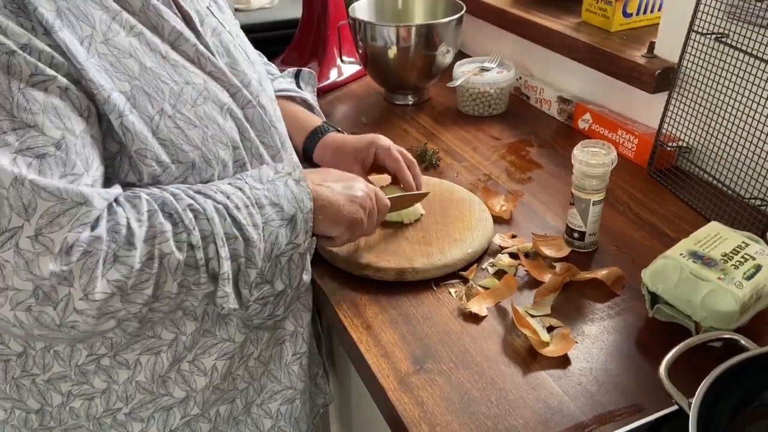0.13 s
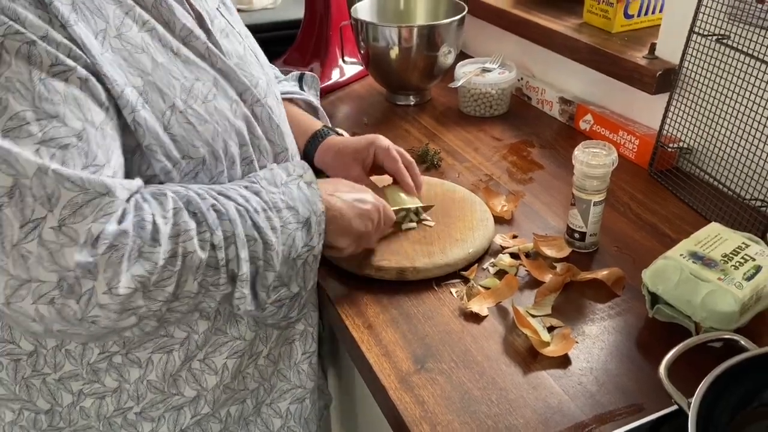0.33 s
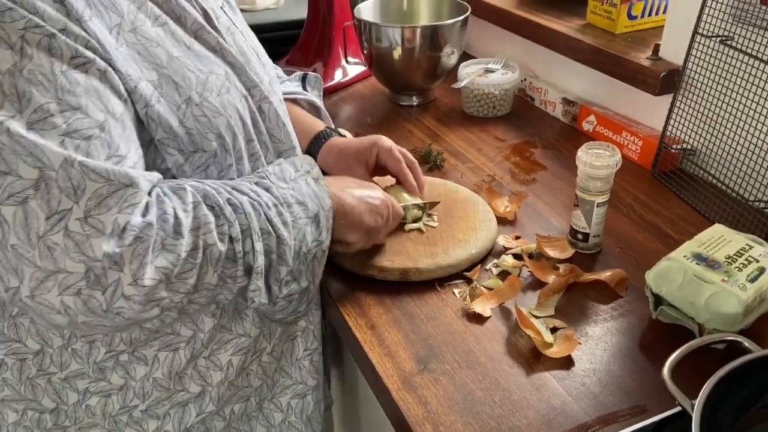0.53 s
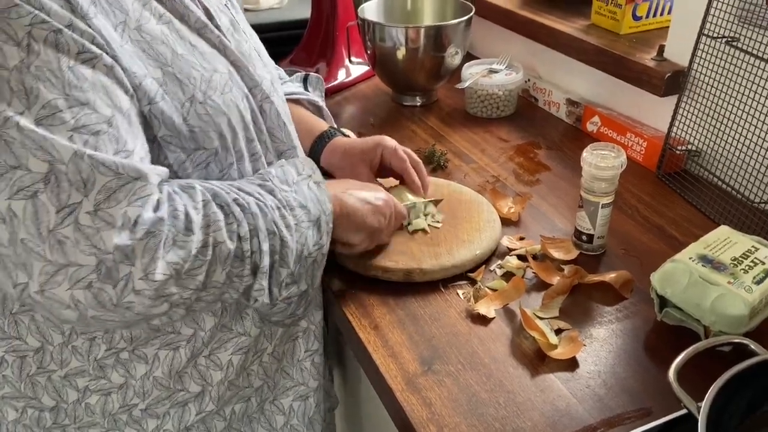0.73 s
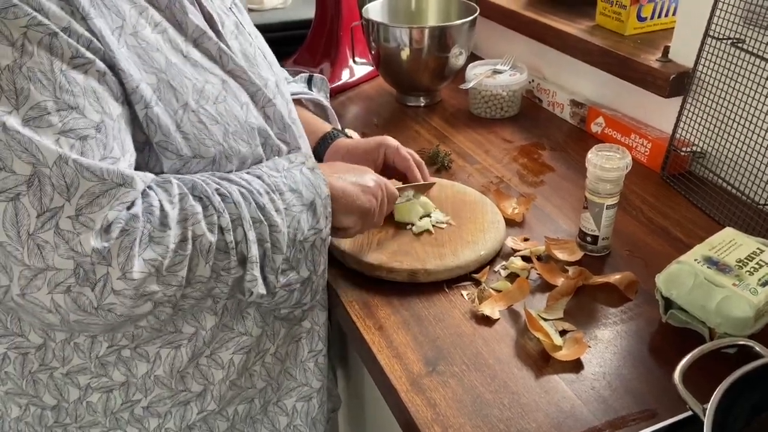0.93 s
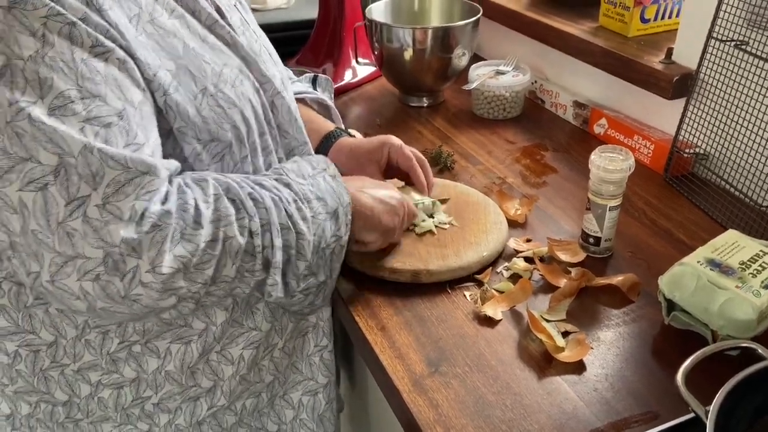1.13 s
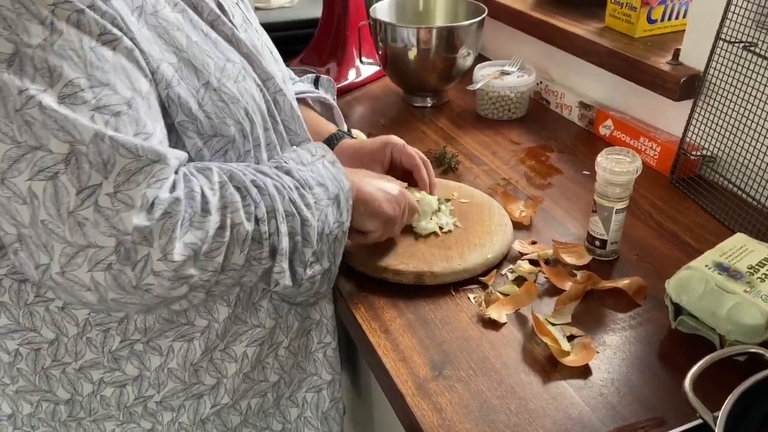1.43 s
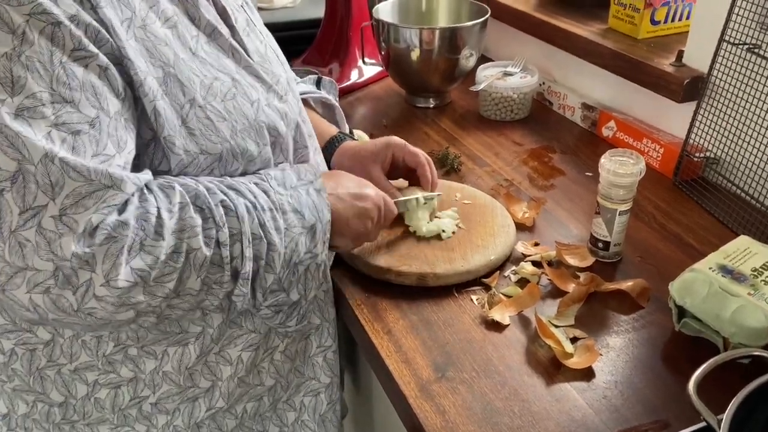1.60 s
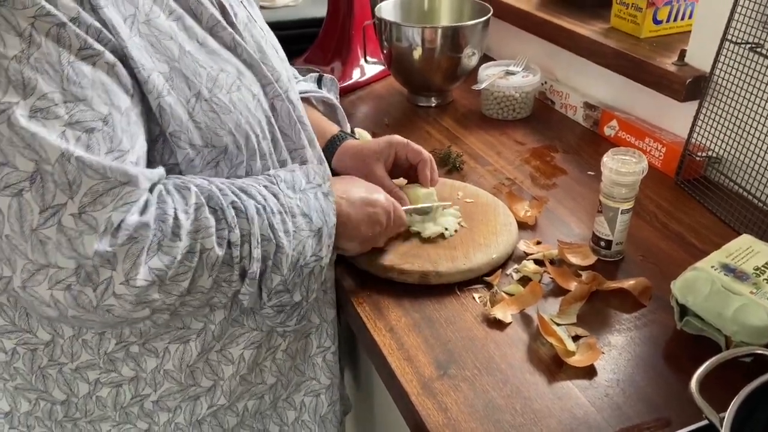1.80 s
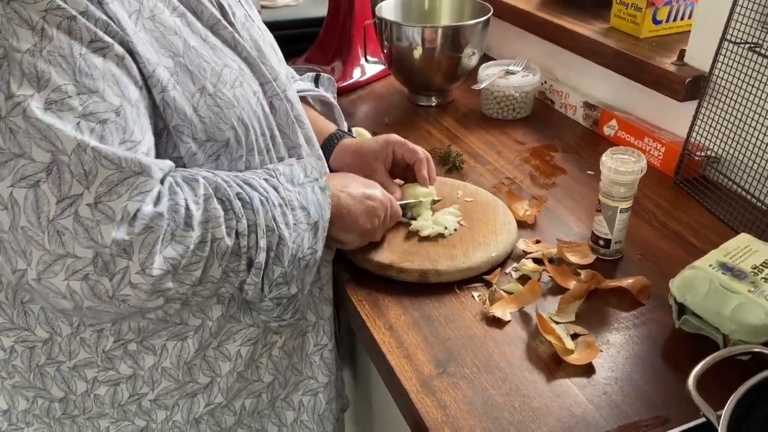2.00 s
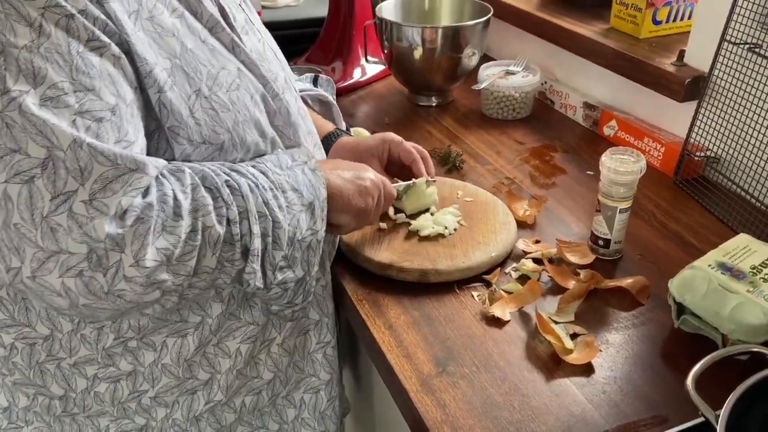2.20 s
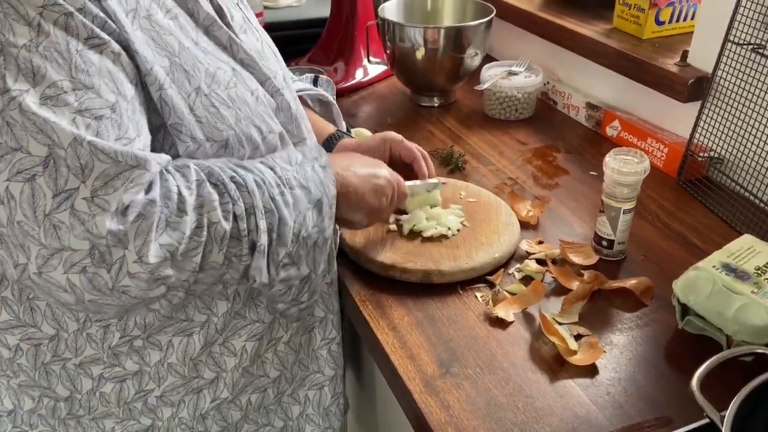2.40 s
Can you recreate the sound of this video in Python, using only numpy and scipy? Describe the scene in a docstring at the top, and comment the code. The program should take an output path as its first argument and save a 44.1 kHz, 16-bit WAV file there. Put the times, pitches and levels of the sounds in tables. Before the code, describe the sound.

Kitchen knife chopping an onion on a wooden board, crisp crunches and sharp knocks, close up

```python
"""Sharp knocks of a kitchen knife on a round wooden board are heard, each after an onion's crunch, close to a phone.
Knocks are damped blade and board modes; the crunch is random grains in noise; the last cut ends without a knock.
Delayed echoes and decaying noise bands give the small kitchen's brief ring; the counter adds dull bumps.
The phone's noise suppressor attenuates quiet passages, so the room hiss comes forward only around sounds."""
import sys
import numpy as np
from scipy import signal
from scipy.fft import rfft, irfft
from scipy.io import wavfile
from scipy.ndimage import uniform_filter1d

SR = 44100
rng = np.random.default_rng(int(sys.argv[2]) if len(sys.argv) > 2 else 0)


def generate_wav(signal):
    """Clip the signal to [-1, 1] and save it as 16-bit WAV at the path in sys.argv[1]."""
    frames = np.transpose(np.atleast_2d(signal))
    scaled = np.clip(frames, -1, 1) * 32767
    pcm = np.round(scaled).astype(np.int16)
    wavfile.write(sys.argv[1], SR, pcm)


N = 112454

# Levels in the tables are relative; gains below or in the functions are added to them.
# spectral density of room tone and microphone hiss: f/Hz, level/dB
HISS_SPECTRUM = [(24, -47), (40, -19), (151, -5), (312, -15), (382, -21.5), (585, -15), (2770, -35.5),
                 (9940, -32.5), (14500, -27.5), (16000, -42.5)]
# dull bumps of the counter under the hands: t/s, level/dB
COUNTER_BUMPS = [(.25, -49.5), (.325, -55), (.455, -54), (.492, -45), (.565, -54.5), (.728, -43.5),
                 (.81, -53.5), (1.1, -45), (1.17, -51), (1.375, -41.5), (1.51, -45.5), (1.725, -47.5),
                 (1.985, -46), (2.243, -38), (2.275, -42.5), (2.33, -60)]
# echoes off counter and nearby walls: delay/s, left gain, right gain
NEAR_ECHOES = [(.0011, -0.091, 0.27), (.0031, 0.66, .5), (.0052, -0.47, .5), (.0073, .5, .2),
               (0.014, -.2, .35), (.0165, 0.59, .2), (.0195, .2, .3)]
# decay of the kitchen's reverberation: f/Hz, t60/s
KITCHEN_DECAY = [(100, 0.25), (300, 0.44), (800, .26), (2000, 0.28), (5000, 0.22), (12000, 0.12)]
# initial spectrum of the reverberation: f/Hz, level/dB
KITCHEN_SPECTRUM = [(100, 1), (500, -13), (1500, -6.5), (3200, -9), (5000, -5), (6500, -4), (16000, 1)]
# left-right correlation of the reverberation: f/Hz, correlation (0 to 1)
KITCHEN_CORRELATION = [(100, 0.89), (500, 0.83), (1500, 0.39), (5000, 0.13), (14000, 0.34)]
# stereo balance: f/Hz, left minus right level/dB
STEREO_BALANCE = [(60, -0.5), (300, -2.5), (1000, 0), (2000, 1.5), (4500, 3.5), (9000, 2.5), (14000, 1.5)]
# blade going through the onion, one list a stroke: t/s, crunch level/dB, push on the board level/dB
CUT_STROKES = [
    [(0.209, -50, -61.5), (0.231, -49.5, -52.5), (0.237, -39, -47.5)],
    [(0.438, -54, -49.5), (0.454, -47, -47), (0.471, -36, -43.5)],
    [(0.68, -49, -54.5), (0.688, -66, -41), (0.696, -54.5, -43.5), (0.704, -39.5, -96), (0.712, -62, -40),
     (0.719, -43, -39)],
    [(1.03, -69, -99), (1.056, -46, -50), (1.081, -40, -48.5)],
    [(1.312, -64, -56.5), (1.332, -49.5, -52.5), (1.338, -62.5, -62), (1.348, -60.5, -50),
     (1.362, -61.5, -40.5), (1.388, -34, -45)],
    [(1.68, -77, -103.5), (1.684, -64.5, -83), (1.712, -41.5, -49.5)],
    [(1.935, -57.5, -71), (1.941, -46, -42), (1.951, -43.5, -38.5), (1.961, -33.5, -48)],
    [(2.189, -48.5, -67), (2.195, -64, -59), (2.227, -46.5, -43), (2.25, -33, -38.5)],
    [(2.503, -68, -87), (2.515, -74.5, -68.5), (2.527, -68.5, -73.5), (2.549, -51.5, -55.5)],
]
# small snaps of onion layers and the lifting blade: t/s, level/dB, decay time constant/s
LAYER_SNAPS = [(0.3384, -42, 0.0021), (0.4225, -47.5, 0.0054), (0.438, -47, 0.0056), (0.463, -47, 0.0029),
               (0.653, -50.5, 0.0057), (0.6772, -36.5, 0.005), (0.7074, -32, 0.011), (0.722, -27.5, 0.0046),
               (1.0313, -48, 0.0033), (1.053, -37.5, 0.0029), (1.0801, -30.5, 0.01), (1.285, -48, 0.0029),
               (1.3116, -35, 0.0023), (1.3326, -40, 0.0027), (1.346, -32.5, 0.0075), (1.348, -47, 0.0035),
               (1.3673, -30.5, 0.0049), (1.398, -37, 0.0022), (1.4742, -39.5, 0.0094),
               (1.4944, -51, 0.0028), (1.5495, -50.5, 0.0031), (1.6506, -50, 0.0071), (1.8997, -50.5, 0.01),
               (1.938, -33.5, 0.0026), (2.1884, -39.5, 0.004), (2.2023, -36, 0.0089),
               (2.224, -31.5, 0.0028), (2.238, -35, 0.004), (2.26, -18, 0.0015), (2.353, -42, 0.0068),
               (2.5023, -46.5, 0.0062)]
# faint treble rustle before some of the cuts, one list a passage: t/s, level/dB
FAINT_RUSTLES = [
    [(0.07, -103), (0.112, -63.5), (0.188, -63.5), (0.21, -58)],
    [(1.6, -93.5), (1.66, -87), (1.67, -90), (1.68, -62)],
    [(1.76, -66), (1.812, -61), (1.926, -66.5), (1.935, -55)],
]
# spectrum of bursting cells: f/Hz, level/dB
CRUNCH_SPECTRUM = [(600, -28), (1500, -10), (3000, -3.5), (4500, -2.5), (6000, -7.5), (9000, -8),
                   (12000, -7.5), (14500, -6), (16000, -2)]
# board modes that the pushing blade shakes: f/Hz, bandwidth/Hz, level/dB
PUSHED_MODES = [(390, 100, -13), (520, 45, -4), (745, 45, 0), (930, 100, -12), (1500, 900, -22)]
# blade meets board: t/s, blade tick level/dB, upper board modes level/dB, deep board modes level/dB
BLADE_LANDINGS = [(.2470, -17.5, -16.5, -19), (.4814, -18.5, -16.5, -19.5), (.7290, -22.5, -18.5, -20),
                  (1.0906, -24.5, -20.5, -19.5), (1.3979, -24, -20, -19), (1.7224, -27, -25, -25),
                  (1.9710, -19.5, -21, -21), (2.2605, -18, -21, -20.5)]
# board modes: f/Hz, level/dB, t60/s
BOARD_MODES = [(207.3, -26.5, 0.047), (285, -10.5, 0.021), (453.5, -10.5, 0.033), (536, -8, 0.067),
               (745.6, -2, 0.028), (902, 1.5, 0.021), (1209.7, -13, 0.028), (1303, -8.5, 0.033),
               (1585.5, 0.5, 0.011), (1808, 9.5, 0.0077), (2187, 11.5, 0.006), (2590, 10.5, 0.0039)]
# blade modes: f/Hz, level/dB, t60/s
BLADE_MODES = [(3563, 6, 0.0048), (4396, -6.5, 0.012), (4822, 11, 0.0027), (5343, -9, 0.002),
               (6020, -19, 0.0097), (8420, -21, 0.0057)]

HISS_DB, HISS_CORRELATION = -62, 0.38  # RMS level ahead of the suppressor
THUD_HZ, THUD_T60_S, THUD_RISE_CYCLES = 109.5, 0.098, 0.44

TAIL_DB, TAIL_RISE_S = -4, 0.0084
ECHO_LOW_HZ, ECHO_HIGH_HZ = 650, 2320  # small surfaces return little bass; echoes are duller above
ONION_ROOM_DB = -0.5  # share of the onion sound that excites the room

GRAINS_PER_S, GRAIN_SPREAD_DB, PATCH_DB = 2400, -2.5, 2.8
PUSH_DB, SNAP_DB = 3.5, -5.5
LANDING_HOLD_S = 0.0095  # a stroke outlasts its last table row by this

KNOCK_DB, UPPER_BOARD_DB = 6.5, 1
DEEP_BELOW_HZ, DEEP_LAG_S = 1050, 0.0018
RISE_CYCLES, DEEP_RISE_CYCLES = 1, 0.59  # onset time constant in cycles of each mode

SHUT_BELOW_DB, OPENING_RANGE_DB = -64, 10.5  # fully open at the sum of the two
SHUT_TREBLE_DB, SHUT_BASS_DB, SPLIT_HZ = -15.5, -14.5, 3600
CLOSING_DB_PER_S = 156  # in the treble
BASS_CUTOFF_HZ, TREBLE_CUTOFF_HZ = 81.4, 15800


def amp(db):
    """Level and amplitude: 20 dB is a factor of ten."""
    return 10 ** (np.asarray(db, float) / 20)


def evened(x):
    """Normalization to unit RMS."""
    return x / np.sqrt(np.mean(x ** 2) + 1e-20)


def read(points, hz):
    """Linear interpolation on a logarithmic frequency axis."""
    f, value = np.transpose(points)
    return np.interp(np.log(hz + 1), np.log(f + 1), value)


def colour(x, points):
    """Linear filtering: the spectrum is multiplied by a gain given in dB."""
    gain = amp(read(points, np.fft.rfftfreq(N, 1 / SR)))
    return irfft(rfft(x) * gain, N)


def correlated(a, b, correlation):
    """Partial coherence: mixing independent noises gives a pair of the stated correlation."""
    return np.array([a, correlation * a + np.sqrt(1 - correlation ** 2) * b])


def ring(modes, rise_cycles, weight=-1):
    """Modal superposition: damped sines, successively multiplied by weight, scaled to peak 1."""
    t = np.arange(SR // 3) / SR
    x = np.zeros(len(t))
    for k, (hz, db, t60) in enumerate(modes):
        decay = amp(db - 60 * t / t60)
        onset = 1 - np.exp(-t * hz / rise_cycles)
        x += weight ** k * decay * onset * np.sin(2 * np.pi * hz * t)
    return x / abs(x).max()


def blows(table, column):
    """Impulsive excitation: one unit sample per row, scaled by the level in a column."""
    x = np.zeros(N)
    for row in table:
        x[round(row[0] * SR)] = amp(row[column])
    return x


def hiss():
    """Stationary noise: coloured and partly coherent between the channels."""
    a, b = rng.standard_normal((2, N))
    pair = correlated(a, b, HISS_CORRELATION)
    return amp(HISS_DB) * evened(colour(pair, HISS_SPECTRUM))


def bumps():
    """Impulse response of a single damped mode: the counter thuds."""
    thud = ring([(THUD_HZ, 0, THUD_T60_S)], THUD_RISE_CYCLES)
    return signal.oaconvolve(blows(COUNTER_BUMPS, column=1), thud)[:N]


def kitchen(x):
    """Room impulse response: band-limited early echoes, then frequency-dependent exponential decay."""
    length = SR // 2
    hz, t, z = signal.stft(rng.standard_normal((2, length)), SR, nperseg=256)
    correlation = np.clip(read(KITCHEN_CORRELATION, hz), 0, 1)[:, None]
    z = correlated(z[0], z[1], correlation)
    z = z * amp(read(KITCHEN_SPECTRUM, hz)[:, None] - 60 * t / read(KITCHEN_DECAY, hz)[:, None])
    tail = signal.istft(z, SR, nperseg=256)[1][:, :length]
    tail = tail * np.minimum(np.arange(length) / SR / TAIL_RISE_S, 1) ** 2
    tail = amp(TAIL_DB) * tail / np.linalg.norm(tail, axis=1)[:, None]

    near = np.zeros(tail.shape)
    for s, left, right in NEAR_ECHOES:
        near[:, round(s * SR)] = left, right
    near = signal.lfilter(*signal.butter(1, [ECHO_LOW_HZ, ECHO_HIGH_HZ], "band", fs=SR), near)
    return signal.fftconvolve(x[None], tail + near, axes=1)[:, :N]


def stroke_level(column):
    """Amplitude envelope: level interpolated through each cut and held briefly at its end."""
    t, out = np.arange(N) / SR, np.zeros(N)
    for cut in CUT_STROKES:
        rows = np.array(cut)
        level = amp(np.interp(t, rows[:, 0], rows[:, column], left=-200))
        out += level * (t < rows[-1, 0] + LANDING_HOLD_S)
    return out


def crackle():
    """Granular noise: random clicks of bursting cells in wet fizz, in patches of changing colour."""
    sizes_db = GRAIN_SPREAD_DB * np.minimum(rng.exponential(1, N), 3)
    grains = (rng.random(N) < GRAINS_PER_S / SR) * amp(sizes_db) * rng.choice([-1., 1.], N)
    fizz = rng.standard_normal(N)
    z = signal.stft(colour(evened(grains) + fizz, CRUNCH_SPECTRUM), nperseg=128)[2]
    # smoothing over 8 bins and 5 frames makes the patches
    patches = uniform_filter1d(rng.standard_normal(z.shape), size=8, axis=0)
    patches = uniform_filter1d(patches, size=5, axis=1)
    return evened(signal.istft(z * amp(PATCH_DB * evened(patches)), nperseg=128)[1][:N])


def pushed_board():
    """Forced resonance: continuous random excitation by the blade drives the board modes."""
    push = np.zeros(N)
    for hz, width, db in PUSHED_MODES:
        resonator = signal.iirpeak(hz, hz / width, SR)
        push += amp(db) * evened(signal.lfilter(*resonator, rng.standard_normal(N)))
    return amp(PUSH_DB) * stroke_level(column=2) * evened(push)


def onion():
    """Amplitude modulation: cuts, faint rustles and decaying snaps shape the crackle; the board joins in."""
    t = np.arange(N) / SR
    level = stroke_level(column=1)
    for rustle in FAINT_RUSTLES:
        level += amp(np.interp(t, *np.transpose(rustle), left=-200, right=-200))
    for s, db, decay in LAYER_SNAPS:
        level += amp(db + SNAP_DB) * (t >= s) * np.exp(-np.maximum(t - s, 0) / decay)
    return level * crackle() + pushed_board()


def knocks():
    """Impact excitation of modes: blade and board ring, the deep board modes a moment later."""
    deep_modes = [m for m in BOARD_MODES if m[0] <= DEEP_BELOW_HZ]
    upper_modes = [m for m in BOARD_MODES if m[0] > DEEP_BELOW_HZ]
    blade = ring(BLADE_MODES, RISE_CYCLES)
    upper = amp(UPPER_BOARD_DB) * ring(upper_modes, RISE_CYCLES, weight=0.72)
    deep = np.pad(ring(deep_modes, DEEP_RISE_CYCLES), (round(DEEP_LAG_S * SR), 0))
    parts = [blade, upper, deep]
    hits = sum(signal.oaconvolve(blows(BLADE_LANDINGS, column=k + 1), body)[:N]
               for k, body in enumerate(parts))
    return amp(KNOCK_DB) * hits


def scene():
    """Linear superposition: direct sound and room response, balanced in stereo, over the hiss."""
    hits, cut = knocks(), onion()
    both = hits + cut + bumps() + kitchen(hits + amp(ONION_ROOM_DB) * cut)
    left = colour(both[0], [(f, db / 2) for f, db in STEREO_BALANCE])
    right = colour(both[1], [(f, -db / 2) for f, db in STEREO_BALANCE])
    return np.array([left, right]) + hiss()


def record(dry):
    """Downward expansion: the suppressor opens fast and shuts slowly; then the band is limited."""
    power_db = 10 * np.log10(abs(uniform_filter1d((dry ** 2).mean(0), 300)) + 1e-12)
    shut = np.clip((SHUT_BELOW_DB + OPENING_RANGE_DB - power_db) / OPENING_RANGE_DB, 0, 1)
    # a running maximum against a falling ramp limits only the closing rate
    fall = np.arange(N) * CLOSING_DB_PER_S / SR
    treble_db = np.maximum.accumulate(SHUT_TREBLE_DB * shut + fall) - fall
    treble_db = uniform_filter1d(treble_db, 100)
    bass_db = treble_db * SHUT_BASS_DB / SHUT_TREBLE_DB

    bass = signal.filtfilt(*signal.butter(1, SPLIT_HZ, fs=SR), dry)
    gated = bass * amp(bass_db) + (dry - bass) * amp(treble_db)
    gated = signal.sosfilt(signal.butter(4, BASS_CUTOFF_HZ, "high", fs=SR, output="sos"), gated)
    lowpass = signal.firwin(511, TREBLE_CUTOFF_HZ, window=("kaiser", 9), fs=SR)
    return signal.oaconvolve(gated, lowpass[None], "same")


dry = scene()
out = record(dry)
generate_wav(out)
```